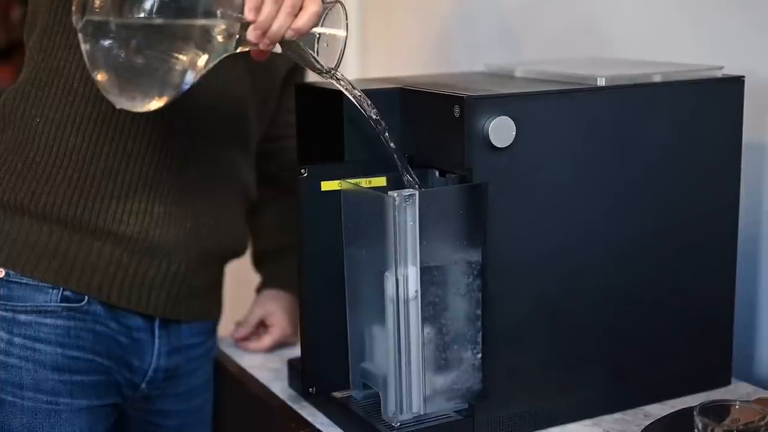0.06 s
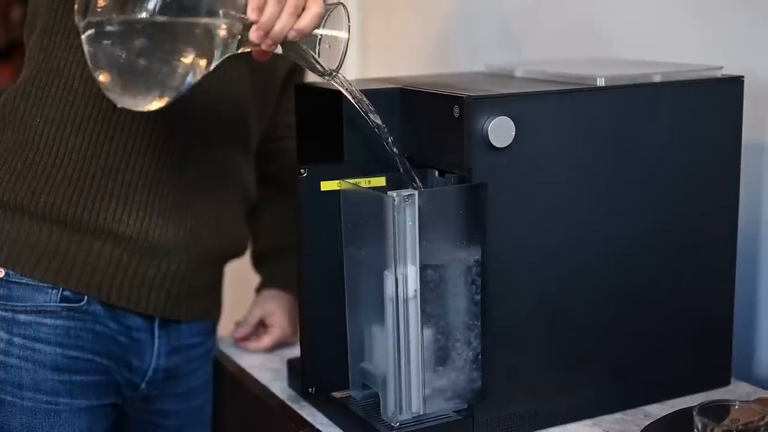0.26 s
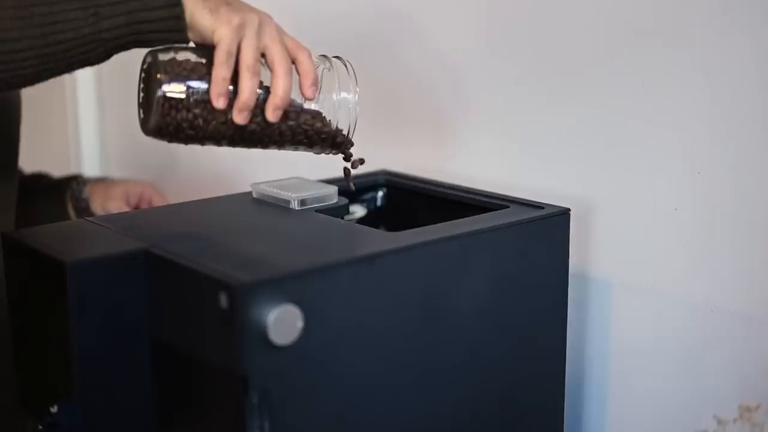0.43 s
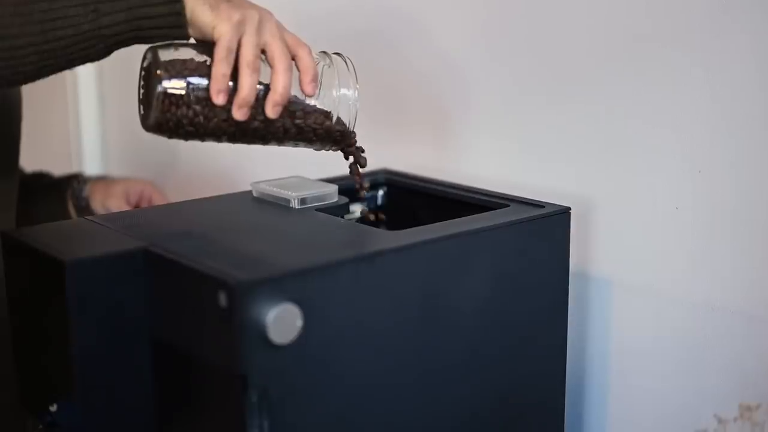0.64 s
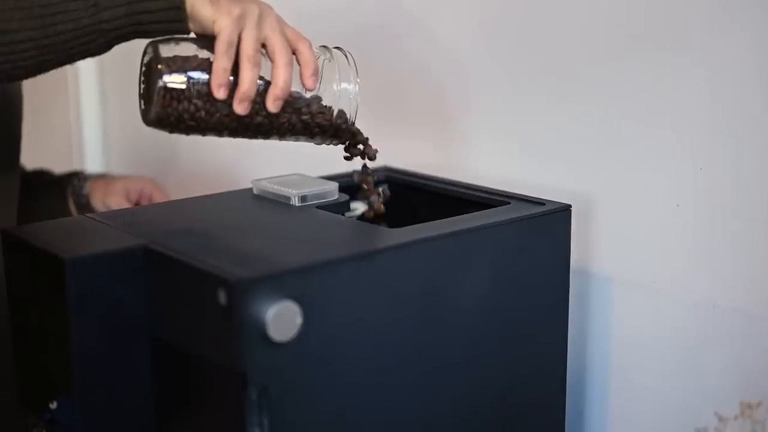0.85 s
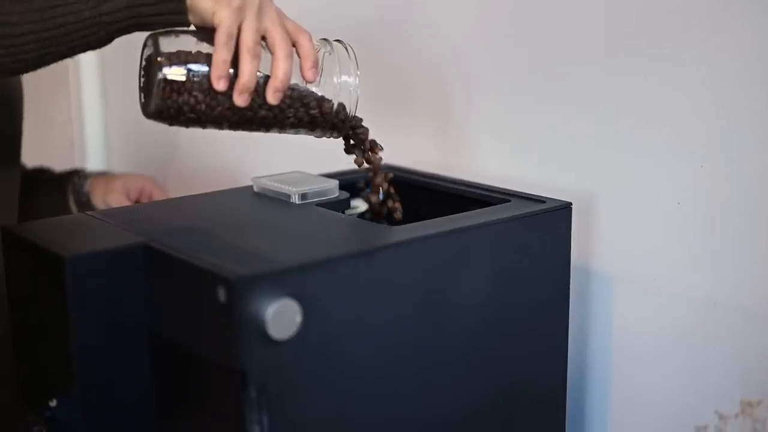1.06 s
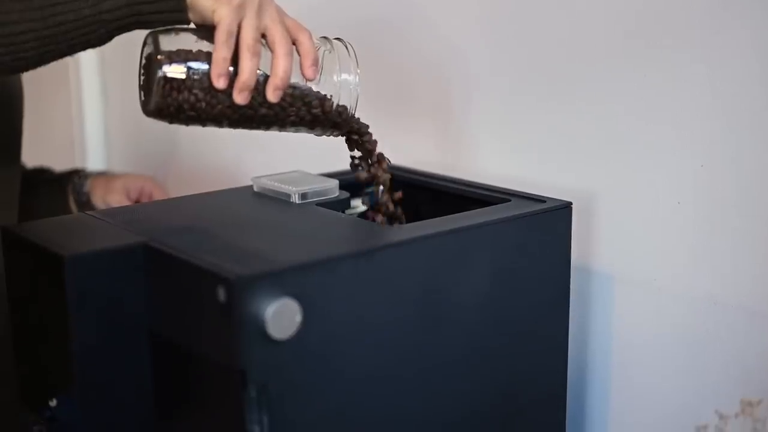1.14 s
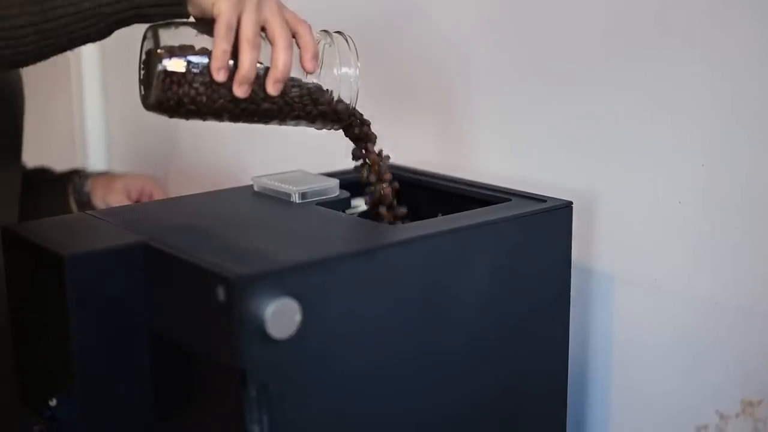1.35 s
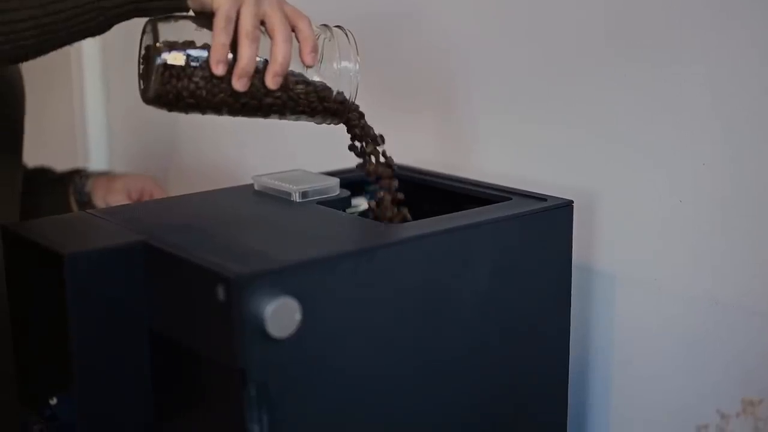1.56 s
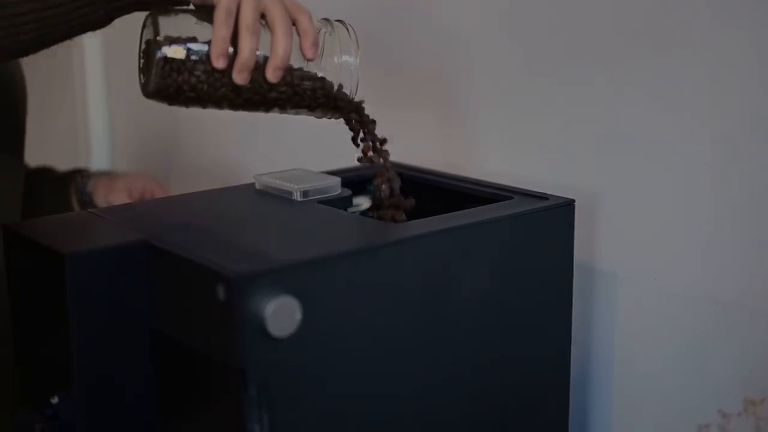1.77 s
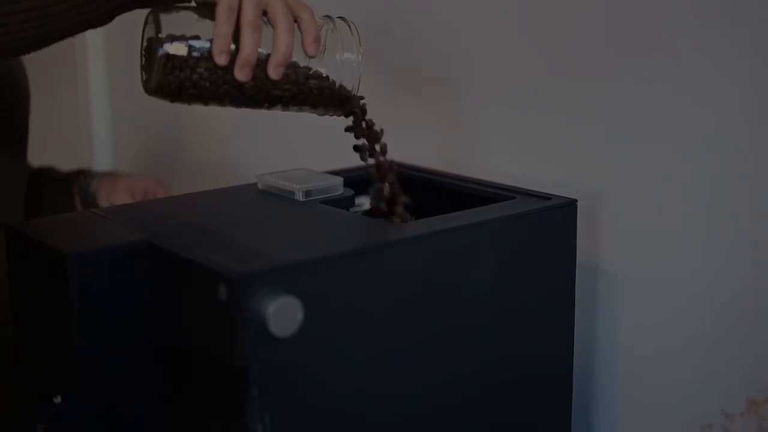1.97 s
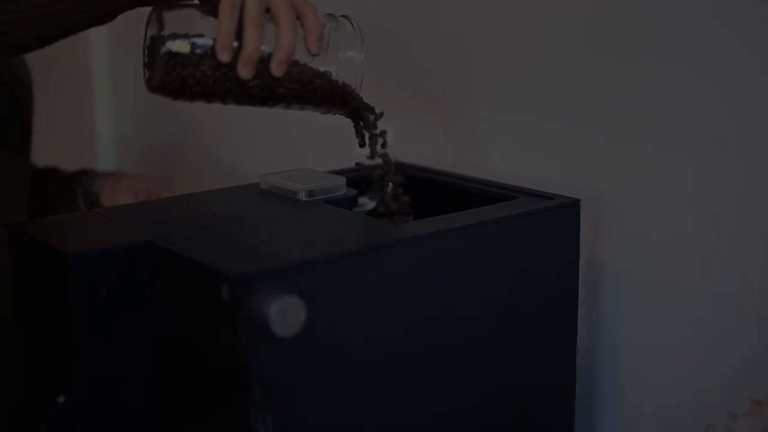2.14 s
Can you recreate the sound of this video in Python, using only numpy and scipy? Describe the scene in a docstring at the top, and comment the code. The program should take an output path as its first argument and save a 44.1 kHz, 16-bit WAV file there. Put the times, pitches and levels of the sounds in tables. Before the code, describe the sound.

Coffee beans pour from a glass jar, clattering then pattering, following a short water splash.

```python
"""In a small, quiet room, water splashes briefly into the plastic tank of an espresso machine,
with gulps of air and two droplets. Then coffee beans pour from a glass jar into the hopper, the
machine's bean holder. The first beans clack on the bare plastic and thicken to a loud rattle that
makes the hopper ring and the casing drum. As a pile builds, the rattle dulls to a soft patter with
bright bean-on-bean ticks, stray knocks on the wall and a faint ring from the jar."""
import sys
import numpy as np
from scipy import signal
from scipy.io import wavfile

SR = 44100
rng = np.random.default_rng(int(sys.argv[2]) if len(sys.argv) > 2 else 0)


def wrap_up_sound(samples):
    """Save the sound to the file named by the first command line argument, as 16-bit audio."""
    columns = np.atleast_2d(samples).T
    # keep every value between -1 and 1, then stretch to whole-number steps
    tamed = np.clip(columns, -1, 1)
    steps = np.round(tamed * 32767).astype(np.int16)
    wavfile.write(sys.argv[1], SR, steps)


N = 97461
T = np.arange(N) / SR

# tone of splashing water, from bass to treble: (frequency [Hz], level [dB])
SPLASH_COLOUR = [(25, -51), (80, -10.5), (200, -10.5), (470, -2), (900, -10.5), (1500, -3), (1900, -11.5),
                 (3800, -5), (4800, -27), (10000, -27), (15500, -34)]
# larger splashes: (time [s], level [dB])
SPLASHES = [(0.108, -53.5), (0.221, -47), (0.233, -48.5), (0.264, -45.5)]
# gulps of air: (time [s], level [dB], bubble pitch [Hz], tank boom relative to the bubble [dB])
GULPS = [(0.002, -56.5, 310, -6.5), (0.108, -54, 476, -1), (0.157, -54, 462, 0), (0.219, -46, 321, 3.5),
         (0.232, -45, 437, -1), (0.257, -47, 498, -5), (0.286, -45, 431, -3), (0.305, -56, 390, 3)]
# notes the tank rings at: (pitch [Hz], level [dB], time to fade by 60 dB [s])
TANK_NOTES = [(317, 2, 0.14), (486, 6, 0.052), (665, 4, 0.031), (1202, 2, 0.05), (1580, -13, 0.033)]
# droplets landing in the tank: (time [s], level [dB], pitch [Hz])
DRIPS = [(0.077, -47.5, 3840), (0.216, -47, 3950)]
# tone of the room's hush: (frequency [Hz], level [dB])
HUSH_COLOUR = [(20, -28), (40, -26), (65, -5.5), (110, -4), (240, -11.5), (400, -4.5), (1000, -4),
               (4000, -9), (16000, -27.5)]
# the stream of bean-on-bean ticks: (time [s], level [dB])
TICKING_LEVEL = [(0.4, -61), (0.85, -66), (1.2, -47.5), (1.55, -43.5), (1.93, -45.5), (2.03, -40.5),
                 (2.16, -41), (2.19, -51)]
# the sharpest single ticks, the first a bean clinking on the glass jar: (time [s], level [dB], pitch [Hz])
SHARP_TICKS = [(0.323, -25.5, 5800), (0.882, -24, 12100), (1.5423, -26, 12100), (1.904, -26, 10600),
               (2.0013, -29.5, 13300), (2.031, -29, 11400), (2.123, -29.5, 12300), (2.1375, -33, 13300)]
# how long the room echoes: (frequency [Hz], time to fade by 60 dB [s])
ECHO_FADE = [(200, 0.23), (3000, 0.43), (15000, 0.15)]
# single beans knocking on the hopper: (time [s], level [dB], extra treble [dB])
KNOCKS = [(0.335, -34.5, -1), (0.3536, -34, -4), (0.3743, -33.5, 2), (0.389, -29, -9), (0.395, -35, -14),
          (0.4105, -24.5, -3), (0.4299, -27.5, 4), (0.439, -30, -2), (0.461, -25, 0), (0.476, -24.5, 1),
          (0.541, -22.5, -5), (0.5992, -24, -2), (0.692, -27, 1), (0.7733, -25.5, -5),
          (0.8033, -23.5, -3.5), (1.3365, -33.5, -3.5), (1.4234, -36.5, -0.5), (1.467, -35, 1),
          (1.478, -33.5, -7), (1.489, -31.5, -8), (1.5261, -33.5, -3), (1.5968, -35.5, -13),
          (1.6372, -33, -6), (1.656, -36, -13), (1.7062, -38.5, -11), (1.7746, -34, -4),
          (1.7989, -36.5, -10), (1.815, -37, -8), (1.8383, -37, 7), (1.8552, -30, -7.5), (1.868, -38, -3),
          (1.9551, -34, -5.5), (2.0403, -33.5, -7), (2.0896, -40.5, -3), (2.153, -34, -7)]
# tone of a knock: (frequency [Hz], level [dB])
KNOCK_COLOUR = [(50, -50), (200, -34), (800, -25), (1250, -14), (2200, 0), (2800, -2), (3400, 3), (3950, 3),
                (4650, -4.5), (7000, -3.5), (10000, -6.5), (15500, -10.5)]
# notes the hopper rings at: (pitch [Hz], level [dB], time to fade by 60 dB [s])
HOPPER_NOTES = [(1077, -7, 0.15), (1391, 1, 0.099), (1509, 5.5, .09), (1900, -3, 0.12), (2163, -4, .11),
                (2920, 0.5, 0.19), (3055, 0, .08), (3776, -5, 0.12), (3990, 0.5, 0.052)]
# beans striking the bare hopper: (time [s], level [dB])
RATTLE_LEVEL = [(0.375, -39), (0.43, -34), (0.475, -26.5), (0.508, -29), (0.53, -24), (0.6, -25.5),
                (0.7, -25), (0.81, -30), (0.91, -30), (0.97, -38.5), (1.15, -43.5), (1.3, -52), (2.2, -64)]
# tone of the rattle: (frequency [Hz], level [dB])
RATTLE_COLOUR = [(100, -37.5), (260, -21.5), (385, -33.5), (490, -9.5), (720, -5.5), (880, -14), (1060, -4),
                 (1230, -9), (1480, -1.5), (1700, -10), (1950, 1.5), (2500, -6), (3280, 2), (3560, -2.5),
                 (3820, 5.5), (4100, -3), (4600, -8), (7000, -9.5), (10000, -12), (15500, -11.5)]
# beans hitting the hopper's empty floor: (time [s], level [dB])
FLOOR_HITS = [(0.376, -34.5), (0.395, -32.5), (0.431, -40.5), (0.474, -36)]
# notes that floor rings at: (pitch [Hz], level [dB], time to fade by 60 dB [s])
FLOOR_NOTES = [(1085, -1, 0.061), (2224, -2.5, 0.1), (2825, 3, 0.044)]
# air in the hopper humming until beans cover the floor: (time [s], level [dB])
HOLLOW_LEVEL = [(0.4, -59), (0.62, -42.5), (0.78, -46.5), (1.2, -76)]
# the casing drumming under the beans: (time [s], level [dB])
DRUM_LEVEL = [(0.38, -57), (0.6, -60.5), (1.0, -60), (1.4, -60.5), (1.65, -63), (1.85, -59.5), (2.2, -67.5)]
# tone of the drumming: (frequency [Hz], level [dB])
DRUM_COLOUR = [(100, -24), (170, -8), (235, 1), (290, -3.5), (380, -6), (900, -52)]
# dull bumps on the casing: (time [s], level [dB])
BUMPS = [(1.522, -58), (1.909, -51.5), (1.928, -57)]
# tone of a bump: (frequency [Hz], level [dB])
BUMP_COLOUR = [(100, -41), (250, -15), (340, 2.5), (480, -6), (800, -14), (2000, -27)]
# beans landing on the pile: (time [s], level [dB])
PATTER_LEVEL = [(0.8, -49), (1.0, -37), (1.25, -40.5), (1.45, -39.5), (1.65, -38.5), (1.72, -39),
                (1.81, -41.5), (1.92, -42.5), (2.02, -46.5), (2.16, -46.5), (2.2, -50)]
# tone of the patter: (frequency [Hz], level [dB])
PATTER_COLOUR = [(40, -51), (130, -40), (330, -19), (480, -17), (650, -8), (850, -14), (1070, -9),
                 (1220, -7), (1500, -5), (2700, -5), (3400, -0.5), (4100, -0.5), (4650, -12), (6000, -9.5),
                 (9000, -13.5), (15500, -7.5)]
# the jar ringing as beans slide over it: (time [s], level [dB])
JAR_LEVEL = [(1.1, -67), (1.27, -55), (1.4, -56), (1.84, -55), (1.93, -66), (2.0, -52), (2.05, -64)]


def amp(db):
    """Turns decibels into a number to multiply a sound by."""
    return 10 ** (np.asarray(db) / 20)


def unit(x):
    """Scales a sound to an average strength (rms) of one."""
    return x / np.sqrt(np.mean(x ** 2) + 1e-20)


def look_up(points, hz):
    """Reads a table at any frequency, blending between its rows on a pitch scale."""
    row_hz, value = np.transpose(points)
    return np.interp(np.log(hz + 1), np.log(row_hz), value)


def level(points):
    """Loudness over time, silent before the first point."""
    s, db = np.transpose(points)
    return amp(np.interp(T, s, db)) * (T >= s[0])


def add(mix, s, sound):
    """Mixes a sound in, starting at s seconds."""
    part = mix[max(round(s * SR), 0):][:len(sound)]
    part += sound[:len(part)]


def coloured(x, colour, size=2048):
    """Filters a sound to give it the tone in a colour table."""
    hz = abs(np.fft.fftfreq(size, 1 / SR))
    log_gain = np.log(amp(look_up(colour, hz)))
    response = np.exp(np.conj(signal.hilbert(log_gain)))  # so nothing sounds ahead of a hit
    taps = np.fft.ifft(response).real
    return signal.fftconvolve(x, taps[:size // 2])[:len(x)]


def ring(notes, size=8192):
    """An object struck once: its notes start together and each dies away."""
    t = T[:size]
    return sum(amp(db - 60 * t / fade_s) * np.cos(2 * np.pi * hz * t) for hz, db, fade_s in notes)


def resonate(x, hz, width_hz):
    """Keeps a narrow band around one pitch, at strength one."""
    b, a = signal.iirpeak(hz, hz / width_hz, SR)
    return unit(signal.lfilter(b, a, signal.lfilter(b, a, x)))


def waver(max_hz, count=16):
    """A random wobble made of slow waves, at strength one."""
    waves = (np.sin(2 * np.pi * (max_hz * speed * T + phase)) for speed, phase in rng.random((count, 2)))
    return unit(sum(waves))


def swell(t, rise_s):
    """Climbs to one at rise_s, then dies away."""
    return t / rise_s * np.exp(1 - t / rise_s)


def clack(rise_s, decay_s, size=1500):
    """One hit, scattered between close walls: a burst of noise with energy one."""
    t = T[:size]
    burst = rng.standard_normal(size) * (1 - np.exp(-t / rise_s)) * np.exp(-t / decay_s)
    return burst / np.linalg.norm(burst)


def shower(grains, per_s, spread_db):
    """Scatters tiny sounds (grains) at random times and levels; overall strength one."""
    chance, softness = rng.random(N), rng.random(N)
    hits = (chance < per_s / SR) * amp(-spread_db * np.sqrt(softness))
    which = rng.integers(0, len(grains), N)
    return unit(sum(signal.oaconvolve(hits * (which == k), g)[:N] for k, g in enumerate(grains)))


def water(stream_db=-51, air_hz=472, air_db=-56.5, end_s=0.319, stop_s=0.012):
    """A thin stream splashes into the tank; gulps of air ring as bubbles and make the tank boom."""
    drops = [clack(rise_s=0.00011, decay_s=0.0034) for _ in range(12)]
    stream = shower(drops, per_s=450, spread_db=12)
    out = amp(stream_db) * unit(coloured(stream, SPLASH_COLOUR))
    for s, db in SPLASHES:
        splash = coloured(clack(rise_s=0.00023, decay_s=0.014), SPLASH_COLOUR)
        add(out, s, amp(db) * splash / np.std(splash[:512]))
    # the stream keeps the air in the tank singing, unsteady in pitch and loudness
    pitch_hz = air_hz * (1 + 0.032 * waver(max_hz=36.4))
    flutter = amp(3.4 * waver(max_hz=25.7))
    out += amp(air_db) * unit(np.sin(2 * np.pi * np.cumsum(pitch_hz) / SR) * flutter)
    for s, db, hz, boom_db in GULPS:
        boom = signal.fftconvolve(clack(rise_s=0.0008, decay_s=0.011, size=3000), ring(TANK_NOTES))
        add(out, s, amp(db + boom_db) * boom / np.std(boom[:1024]))
        add(out, s, amp(db) * bubble(hz))
    fade_out = np.clip(1 - (T - end_s) / stop_s, 0, 1)
    return out * fade_out


def bubble(hz, rise_s=0.006, decay_s=0.015):
    """Air trapped in water rings with one short note."""
    t = T[:4000]
    note = np.sin(2 * np.pi * hz * t) * (1 - np.exp(-t / rise_s)) * np.exp(-t / decay_s)
    return note / np.std(note[:1024])


def hush(db=-57):
    """The room's low, steady background noise."""
    return amp(db) * unit(coloured(rng.standard_normal(N), HUSH_COLOUR, size=8192))


def drips(spatter_db=-17):
    """Small droplets land with a rough plink and a fine spatter."""
    out, t = np.zeros(N), T[:1500]
    for s, db, hz in DRIPS:
        plink = resonate(rng.standard_normal(len(t)), hz, width_hz=550) * swell(t, rise_s=0.004)
        spatter = unit(rng.laplace(size=len(t))) * swell(t, rise_s=0.007)
        add(out, s, amp(db) * (plink + amp(spatter_db) * spatter))
    return out


def tick(hz, rise_s, size=500):
    """One bean taps another, or the glass of the jar: a very short, high note roughened with noise."""
    t = T[:size]
    rough_note = np.sin(2 * np.pi * hz * t) + 0.45 * rng.standard_normal(size)
    return np.diff(swell(t, rise_s) * rough_note, 2) / 2  # np.diff favours the treble


def ticks(low_hz=11800, high_hz=16000, rise_s=0.00024):
    """Beans click against each other in the jar's mouth and on the pile; early on, one bean clinks on the glass
    jar."""
    grains = [tick(hz, rise_s * rng.uniform(0.57, 1.3)) for hz in np.linspace(low_hz, high_hz, 30)]
    out = level(TICKING_LEVEL) * shower(grains, per_s=1100, spread_db=22)
    for s, db, hz in SHARP_TICKS:
        add(out, s, amp(db) * tick(hz, 2 * rise_s))
    return out


def room_echo(x, db=-12, delay_s=0.0047, size=20000):
    """The walls send back a short, blurred echo whose highest treble dies first."""
    noise = rng.standard_normal(size) * np.clip(T[:size] / delay_s - 1, 0, 1)
    hz, t, bands = signal.stft(noise, SR, nperseg=256)
    fade = amp(-60 * t / look_up(ECHO_FADE, hz)[:, None])
    _, tail = signal.istft(bands * fade, SR, nperseg=256)
    return amp(db) * signal.fftconvolve(x, tail / np.linalg.norm(tail))[:N]


def knocks(treble_hz=4500):
    """Single beans strike the hopper's wall; glancing ones are brighter."""
    out = np.zeros(N)
    for s, db, treble_db in KNOCKS:
        colour = [(hz, base_db + treble_db * (hz > treble_hz)) for hz, base_db in KNOCK_COLOUR]
        knock = coloured(clack(rise_s=0.0011, decay_s=0.0028), colour)
        add(out, s, amp(db) * knock / np.std(knock[:256]))
    return out


def hopper_ring(beans, gain_db=-51):
    """Every hit sets the plastic hopper ringing at its own notes."""
    return amp(gain_db) * signal.fftconvolve(beans, ring(HOPPER_NOTES))[:N]


def bean(hz, ring_s=0.0009, ring_gain=0.6, size=1500):
    """One bean hits plastic: a clack plus the bean's own brief note."""
    t = T[:size]
    note = np.sin(2 * np.pi * hz * t) * np.exp(-t / ring_s)
    return clack(rise_s=0.0003, decay_s=0.0015, size=size) + ring_gain * note / np.linalg.norm(note)


def rattle(low_hz=2500, high_hz=14500):
    """Beans rain on bare plastic; the first ones ring the empty floor, and the air inside hums."""
    grains = [bean(hz) for hz in np.linspace(low_hz, high_hz, 48)]
    hits = shower(grains, per_s=3200, spread_db=5)
    out = level(RATTLE_LEVEL) * unit(coloured(hits, RATTLE_COLOUR))
    for s, db in FLOOR_HITS:
        add(out, s, amp(db) * ring(FLOOR_NOTES))
    hum = level(HOLLOW_LEVEL) * resonate(hits, hz=506, width_hz=69)
    return out + hum


def casing():
    """The machine's casing drums softly under the beans and takes a few dull bumps."""
    clicks = shower([np.ones(1), -np.ones(1)], per_s=340, spread_db=0)
    out = level(DRUM_LEVEL) * unit(coloured(clicks, DRUM_COLOUR, size=8192))
    for s, db in BUMPS:
        bump = coloured(clack(rise_s=0.00045, decay_s=0.0049, size=3000), BUMP_COLOUR)
        add(out, s, amp(db) * bump / np.std(bump[:1024]))
    return out


def patter():
    """Beans land on the growing pile with softer, shorter hits."""
    grains = [clack(rise_s=0.0001, decay_s=0.0015) for _ in range(24)]
    hits = shower(grains, per_s=1300, spread_db=11.5)
    return level(PATTER_LEVEL) * unit(coloured(hits, PATTER_COLOUR))


def jar():
    """Sliding beans rub the glass into a faint, rough ring."""
    return level(JAR_LEVEL) * resonate(rng.standard_normal(N), hz=5860, width_hz=190)


def scene():
    """Water, then the bean pour with its echo, over the room's hush; one channel."""
    beans = rattle() + patter() + knocks()
    pour = beans + hopper_ring(beans) + ticks() + jar() + casing()
    return (hush() + pour + room_echo(pour) + water() + drips())[None]


def record(dry, cutoff_hz=15800):
    """Removes the very highest treble."""
    low_pass = signal.firwin(511, cutoff_hz, window=("kaiser", 9), fs=SR)
    return signal.oaconvolve(dry, low_pass[None], "same")


dry = scene()
out = record(dry)
wrap_up_sound(out)
```